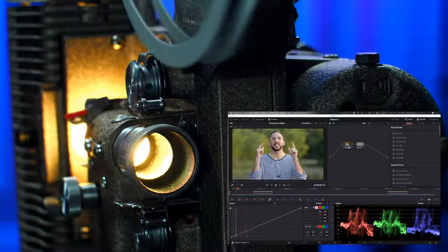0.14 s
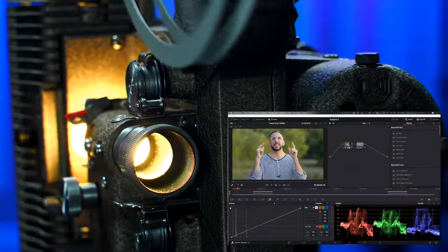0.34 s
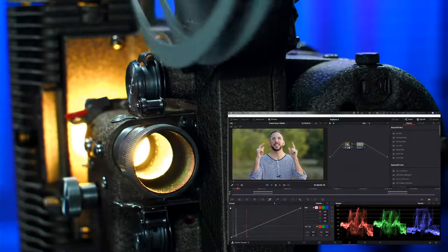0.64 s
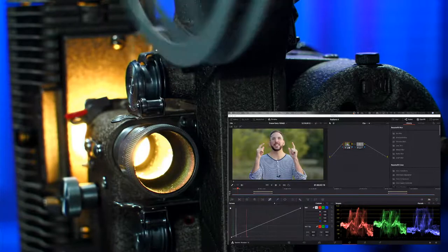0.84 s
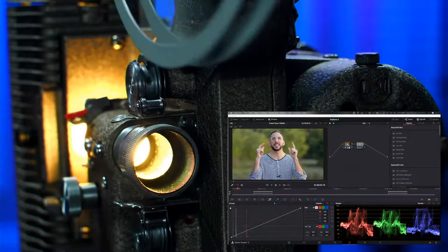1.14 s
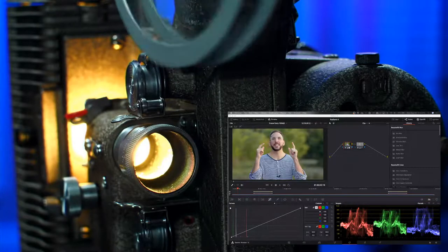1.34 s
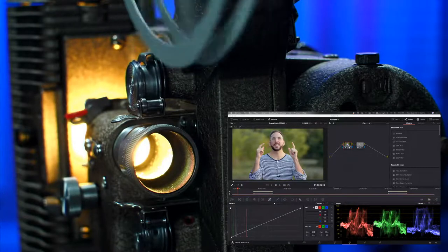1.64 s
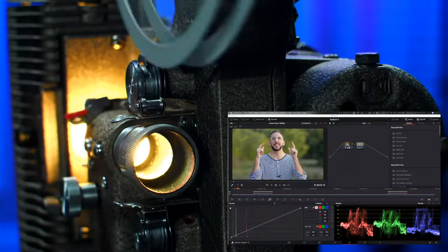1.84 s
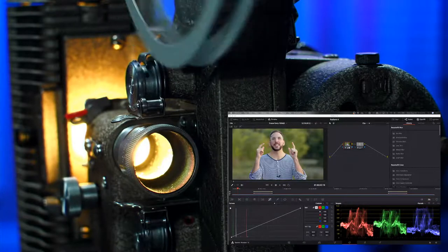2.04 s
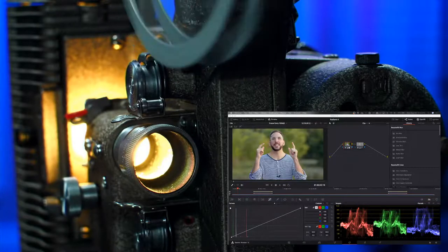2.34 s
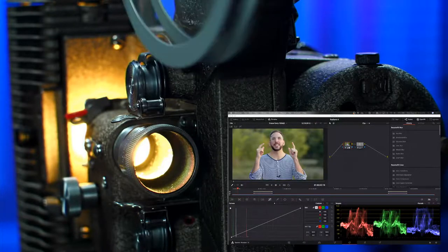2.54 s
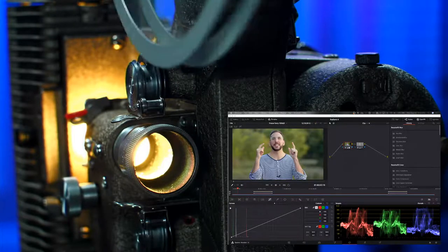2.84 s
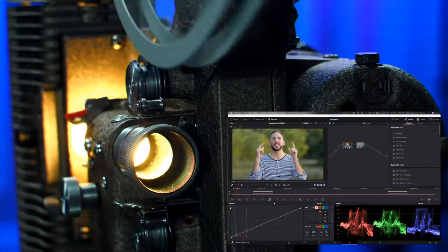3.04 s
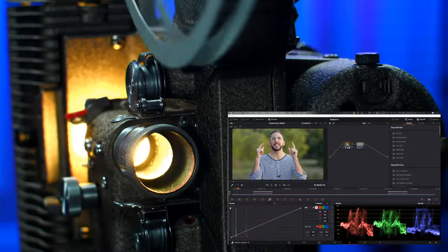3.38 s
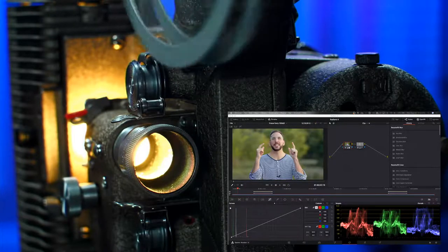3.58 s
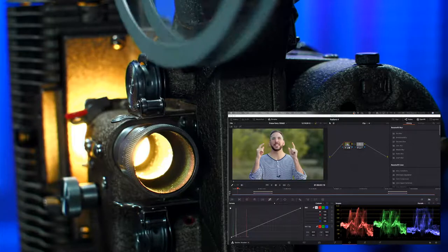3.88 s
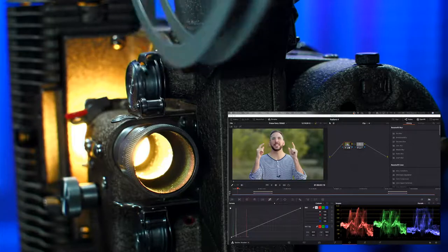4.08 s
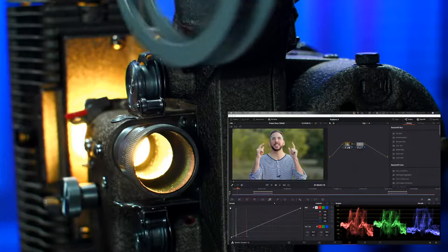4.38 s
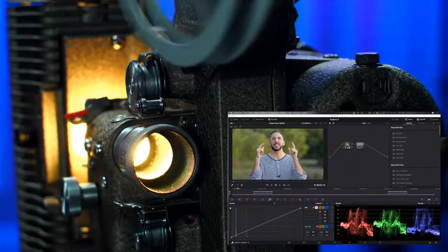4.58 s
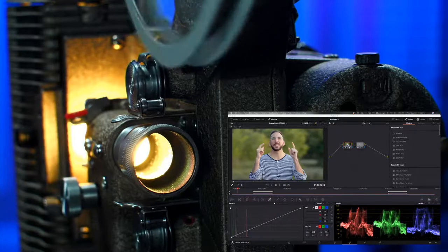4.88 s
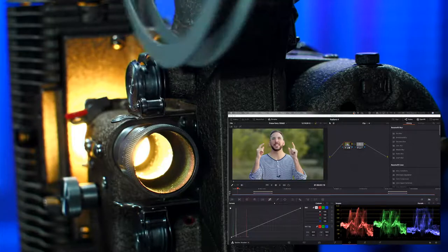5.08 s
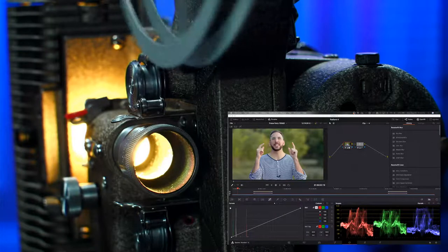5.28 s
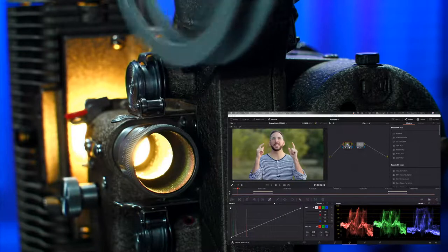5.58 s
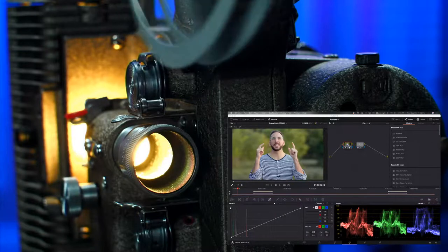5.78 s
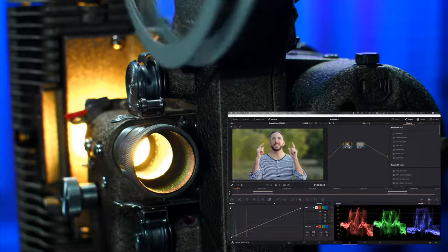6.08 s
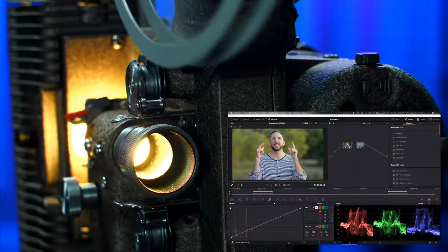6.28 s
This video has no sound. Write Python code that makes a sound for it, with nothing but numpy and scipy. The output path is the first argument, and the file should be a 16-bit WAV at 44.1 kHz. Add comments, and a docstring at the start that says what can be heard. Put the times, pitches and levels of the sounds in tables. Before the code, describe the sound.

An old film projector runs steadily close by, with a fast, bright clatter over a whirring motor.

```python
"""An old film projector running steadily in a room, close to the microphone.
Its steel claw snaps into the film 16 times a second, and the film rattles in the gate.
The motor turns about 76 times a second: the casing sings at the shaft's orders, the gears whine,
and in every turn the brushes hiss and the bearing knocks and ticks.
Cooling air rushes behind it all; the table and nearby walls send back weak early echoes."""
import sys
import numpy as np
from scipy import signal
from scipy.fft import rfft, irfft, next_fast_len
from scipy.io import wavfile
from scipy.ndimage import map_coordinates

SR = 44100
rng = np.random.default_rng(int(sys.argv[2]) if len(sys.argv) > 2 else 0)


def put_to_file(sound):
    """Save the sound as 16-bit audio at rate SR, in the file named by the first command-line argument."""
    columns = np.atleast_2d(sound).T  # one column per channel
    safe = np.clip(columns, -1, 1)
    whole_steps = np.round(safe * 32767)
    wavfile.write(sys.argv[1], SR, whole_steps.astype(np.int16))


N = 283122
FRAMES_PER_TURN = .20942  # gearing from the motor down to the film
BEATS_PER_TURN = .346  # beat of the shaft against the gear teeth

# contacts of claw and film in each frame: phase_frames, level_db, chatter_t60_s
CLAW_CONTACTS = [(0.176, -36, 0.0063), (0.303, -34, 0.0048), (.334, -26.5, 0.009), (0.689, -41, 0.013)]
# resonances of the claw's tip and the gate: pitch_hz, width_hz, level_db
TIP_MODES = [(7370, 130, -9.5), (8310, 200, 3), (8950, 510, 7.5), (10800, 1100, -7)]
# resonances of the claw's arm: pitch_hz, width_hz, level_db
ARM_MODES = [(2750, 700, -4), (4780, 340, 4.5)]
# frames struck harder or softer than usual: time_s, force_db
ODD_STROKES = [(.15, -3), (.34, 2), (.65, -2.5), (.97, 2.5), (1.03, -4), (1.16, 3.5), (1.22, 2.5),
               (1.29, 4), (1.35, -3.5), (2.04, -8), (2.1, 3), (2.6, -11), (2.67, 3), (2.73, -5.5),
               (2.98, -3), (3.3, 3), (3.48, 2), (3.74, 1.5), (3.99, -6), (4.05, -3), (4.3, -4), (4.37, 2),
               (4.56, -1), (4.74, -2), (4.81, 2), (5.19, -3.5), (5.31, 2), (5.56, -3.5), (5.69, 5),
               (5.75, 2), (6.13, -4.5), (6.32, 3)]
def claw(frames):
    """Each contact is a clean blow and a short chatter that ping the claw; hard strokes are brighter."""
    accent_frames, accent_db, scatter_db, chatter_db = 4.73, 1.2, .8, -4
    t = np.arange(SR // 40) / SR
    cushion = signal.butter(4, 11300, fs=SR, output="sos")  # the film softens the top of the ping
    frame = np.arange(int(frames[-1]) + 1)
    force_db = accent_db * np.cos(2 * np.pi * (frame / accent_frames - .01))
    force_db += scatter_db * rng.standard_normal(len(frame))
    for time_s, db in ODD_STROKES:
        force_db[int(frames[int(time_s * SR)])] = db
    out = np.zeros(N + len(t))
    for modes, levels_db in ((TIP_MODES, force_db - 1.7), (ARM_MODES, .5 * force_db - 5)):
        ping = signal.sosfilt(cushion, resonate(np.arange(N) == 0, modes)[:len(t)])
        for phase, db, t60_s in CLAW_CONTACTS:
            decay = amp(-60 * t / t60_s) * (1 - np.exp(-t / .0003))
            decay_norm = np.linalg.norm(decay)
            for start, frame_db in zip(np.searchsorted(frames, frame + phase), levels_db):
                blow = t == 0
                chatter = amp(chatter_db) * decay / decay_norm * rng.standard_normal(len(t))
                ring = signal.fftconvolve(blow + chatter, ping)[:len(t)]
                ring *= decay_norm / np.linalg.norm(ring)  # the cam gives strokes nearly equal energy
                out[start:start + len(t)] += amp(db + frame_db) * ring
    return out[:N]


# motor tones and their beat sidebands: shaft_order, level_db, lower_db, upper_db
MOTOR_TONES = [(3, -69.5, -80, -78), (4, -67, -73, -92), (5, -60.5, -72, -69), (6, -56, -65, -57),
               (7, -43.5, -63, -66), (8, -47, -63, -58.5), (9, -58, -73, -67), (11, -44.0, -45.5, -59.5),
               (12, -60.0, -63.5, -68), (14, -59, -70, -50.5), (15, -49, -56, -59.5),
               (16, -52, -53.0, -63.5), (17, -62.5, -57.5, -57), (18, -53.5, -53.5, -58),
               (19, -70, -74, -52), (20, -58, -55, -52), (21, -52, -60, -54), (22, -56.5, -51, -57),
               (23, -47, -46.5, -55.0), (24, -74, -61.0, -61), (26, -60, -66, -68)]
# low hum of the shaft's unbalance: shaft_order, level_db
UNBALANCE_HUM = [(1, -94), (2, -84)]
def motor(turns):
    """The whir: shaft orders and their sidebands, wavering a little as the load shifts."""
    out = sum(amp(db) * tone(order * turns) for order, db in UNBALANCE_HUM)
    for order, db, lower_db, upper_db in MOTOR_TONES:
        out += amp(db) * casing_tone(turns, order) * waver(depth_db=.9, rate_hz=7)
        lower = amp(lower_db) * casing_tone(turns, order, side=-1)
        upper = amp(upper_db) * casing_tone(turns, order, side=1)
        out += (lower + upper) * waver(depth_db=1.2, rate_hz=10)
    return out


# jolts of the shaft on the casing in each turn: phase_turns, hardest_at_beats
SHAFT_JOLTS = [(0.0, .51), (.11, .09)]
# resonances of the casing: pitch_hz, width_hz, level_db
CASING_MODES = [(487, 59, -6.5), (610, 93, -4.5), (712, 32, -2.5), (792.4, 24.6, 6.5), (1180, 150, -1),
                (1580, 160, -2.5), (1732, 54, 3)]
def casing_tone(turns, order, side=0):
    """A shaft order or its sideband, rms 1; the same jolts set every phase, so together they purr."""
    smear_s = .00008  # spread in travel time through the casing
    multiple = order + side * BEATS_PER_TURN
    push = sum(np.exp(-2j * np.pi * (order * at + side * beat_at)) for at, beat_at in SHAFT_JOLTS)
    pitch_hz = multiple * turns[-1] * SR / N
    phase = np.angle(push * response(pitch_hz, CASING_MODES))
    phase += 2 * np.pi * pitch_hz * smear_s * rng.standard_normal()
    return np.sqrt(2) * np.cos(2 * np.pi * multiple * turns + phase)


# gear and shutter tones: cycles_per_frame, level_db
GEAR_TONES = [(6, -79.5), (9, -74.5), (12, -84), (15, -64.5), (18, -76), (21, -58.5), (30, -61), (36, -53),
              (42, -59), (46, -69), (60, -50)]
def gears(frames):
    """Teeth and shutter blades sing at whole multiples of the frame rate."""
    return sum(amp(db) * tone(order * frames) * waver(depth_db=2.5, rate_hz=8)
               for order, db in GEAR_TONES)


# rise and fall of the shaft's tenth order: time_s, lead_db
SHAFT_LEAD = [(0.0, 8), (0.7, 6.5), (1.35, 4.5), (1.85, -12), (2.4, -5.5), (2.8, -4), (3.1, -3), (4.3, 0),
              (5.55, -4), (6.1, -3)]
def trading_tones(turns):
    """A shaft tone and a gear tone near 750 Hz take turns in the lead: as one swells, the other fades."""
    lead_db = curve(SHAFT_LEAD)
    shaft = amp(-49 + lead_db) * casing_tone(turns, order=10)
    gear = amp(-51 - .49 * lead_db) * tone(45 * FRAMES_PER_TURN * turns)
    return shaft * waver(depth_db=-1.5, rate_hz=4.8) + gear * waver(depth_db=3, rate_hz=4.6)


# resonances of the bearing plate: pitch_hz, width_hz, level_db
BEARING_MODES = [(1977, 66, 0.5), (2133, 74, 4.5), (2310, 107, 1), (2574, 49, 5.5), (2920, 220, 1.5),
                 (3226, 140, 0.5), (3500, 184, 0.5), (4370, 180, -2), (4700, 170, -8), (5094, 80, 1)]
def bearing_rattle(turns):
    """Play in the bearings shakes the casing with a rub and a slower chug; the plate rings steadily."""
    rub = swell(turns, peak_at=.13, depth_db=2.5)
    chug = swell((1 - BEATS_PER_TURN) * turns, peak_at=.32, depth_db=2)
    casing = unit(resonate(rng.standard_normal(N) * rub * chug, CASING_MODES))
    plate = unit(resonate(rng.standard_normal(N), BEARING_MODES))
    return amp(-41.5) * casing + amp(-47.5) * plate


# spots where the brushes catch on the commutator: phase_turns, level_db, pressure_swing_db
BRUSH_CATCHES = [(.2, -19, 8), (.29, -16, 8), (.38, -13, 7), (.47, -4, 4.5), (.55, -2.5, 3.8),
                 (.62, -1, 2.2), (.68, -2, 3.4), (.74, -6, 3.6), (.81, -14, 6), (.9, -16, 8)]
# colour of the brush hiss: frequency_hz, density_db
BRUSH_COLOUR = [(3000, -17.5), (7600, -23.5), (8400, -1), (9200, -8), (10000, -10), (11300, -7), (12100, 1),
                (12750, -2), (13000, -7), (13650, 0), (14200, -13), (15050, -13), (15800, -28)]
# loudness of the brush hiss: time_s, level_db
BRUSH_LEVEL = [(0.0, -46.5), (0.9, -46), (1.4, -48), (1.7, -47.2), (1.95, -52), (2.2, -46.5), (2.45, -47),
               (2.7, -44.5), (3.3, -47), (4.0, -46), (4.8, -45.6), (5.3, -48), (5.8, -46.9), (6.42, -46)]
def brushes(turns):
    """The brushes catch at the same spots each turn: a few always rasp, others only when pressed hard."""
    catch_width_turns = .036
    count = int(turns[-1]) + 3
    claw_load = .85 * np.cos(2 * np.pi * (2 * FRAMES_PER_TURN * turns - .44))  # peaks twice a frame
    hop = rng.standard_normal(count)  # shared by all catches of a turn
    power = amp(-26) ** 2  # smooth sliding between the catches
    for phase, db, swing_db in BRUSH_CATCHES:
        turn = np.round(turns - phase).astype(int)
        bounce = .65 * (hop + rng.standard_normal(count))
        pressure = np.minimum(claw_load + bounce[turn], 1.15)
        catch = np.exp(-((turns - phase - turn) / catch_width_turns) ** 2)
        power += amp(db + swing_db * pressure) ** 2 * catch
    hiss = unit(noise(BRUSH_COLOUR) * np.sqrt(power))
    return amp(curve(BRUSH_LEVEL)) * hiss * waver(depth_db=.4, rate_hz=12)


# colour of the metal body's dense ring: frequency_hz, density_db
METAL_COLOUR = [(1800, -36), (2000, -1.5), (2300, 2), (2450, 2), (2600, 1), (3100, -5.5), (3500, -4.5),
                (4000, -6), (4400, -2.5), (5150, -9), (5700, -10), (7000, -8.5), (9000, -14)]
def bearing_knock(turns):
    """The shaft taps its bearing once a turn, at one of two points, and sets the metal body ringing."""
    turn = np.arange(int(turns[-1]) - 1)
    starts = np.interp(turn + .01, turns, np.arange(N)).astype(int)
    beat_db = 3 * np.cos(2 * np.pi * BEATS_PER_TURN * turn)  # about every third tap is stronger
    force = amp(beat_db + rng.uniform(-3.5, 3.5, len(turn)))
    first_point = rng.random(len(turn)) < .5
    t = np.arange(SR // 12) / SR
    decay = (amp(-60 * t / .044) + amp(-4 - 60 * t / .12)) * (1 - np.exp(-t / .0013))
    out = np.zeros(N)
    for struck in (first_point, ~first_point):
        taps = np.bincount(starts, force * struck, N)
        ring = noise(METAL_COLOUR)[:len(t)] * decay
        out += signal.fftconvolve(taps, ring)[:N]
    return amp(-49.5) * unit(out)


# rattles in each frame, after the claw pulls and as it lets go: phase_frames, level_db, width_frames
FILM_FLAPS = [(.36, 1, 0.023), (.405, -5.5, 0.023), (.535, -1.5, .02), (.6, -6.5, 0.033),
              (.73, -10.5, 0.067)]
# resonances of the gate's sprung pressure plate: pitch_hz, width_hz, level_db
GATE_MODES = [(3474, 140, 5.5), (5720, 170, 0), (6220, 100, 1), (6600, 240, -2), (7290, 170, 1.5),
              (8100, 300, -2.5), (9450, 360, -1.5)]
def film_rattle(frames):
    """The film rattles against the pressure plate in two bursts a frame, then settles."""
    scatter_db = 2.2
    count = int(frames[-1]) + 3
    push = np.zeros(N)
    for phase, db, width in FILM_FLAPS:
        frame = np.round(frames - phase).astype(int)
        force = amp(db + scatter_db * rng.standard_normal(count))
        push += force[frame] * np.exp(-((frames - phase - frame) / width) ** 2)
    return amp(-54) * unit(resonate(push * rng.standard_normal(N), GATE_MODES))


# colour of the bearing's tick: frequency_hz, density_db
TICK_COLOUR = [(1500, -29), (2100, 0.5), (3600, -3), (4500, -9), (6000, -15)]
def bearing_tick(turns):
    """The shaft crosses the play in its bearing with a short dry tick in every turn."""
    phase_turns, width_turns = .99, .048
    offset = (turns - phase_turns + .5) % 1 - .5
    burst = np.exp(-.5 * (offset / width_turns) ** 2)
    return amp(-54.5) * unit(noise(TICK_COLOUR) * burst)


# colour of the air behind the clatter: frequency_hz, density_db
FAN_COLOUR = [(25, -37), (70, -25), (140, -9.5), (200, -11), (270, -0.5), (400, 1.5), (900, -3.5),
              (1350, 1.5), (1900, 2.5), (2450, -4), (3000, -5.5), (3900, -7.5), (5000, -8.5), (5900, -11.5),
              (7500, -17.5), (9000, -12), (15500, -24)]
def fan():
    """Cooling air rushes through the lamp house."""
    return amp(-44) * noise(FAN_COLOUR) * waver(depth_db=1.5, rate_hz=9)


def room(direct):
    """Weak early echoes off the table and nearby walls ripple the treble at the close microphone."""
    echo_db, t60_s = -17.5, .084
    t = np.arange(SR // 25) / SR
    treble = noise([(1200, -29), (2500, 1.5), (8000, 2), (13000, -3)])
    echoes = treble[:len(t)] * amp(-60 * t / t60_s)
    return direct + amp(echo_db) * signal.fftconvolve(direct, echoes / np.linalg.norm(echoes))[:N]


def amp(db):
    """Decibels to gain."""
    return 10 ** (np.asarray(db) / 20)


def unit(x):
    """Scale to rms 1."""
    return x / np.sqrt(np.mean(x ** 2) + 1e-20)


def curve(rows):
    """One value per sample from rows of time_s, value."""
    return np.interp(np.arange(N) / SR, *np.transpose(rows))


def tone(cycles):
    """A sine of rms 1 that follows a running count of cycles."""
    return np.sqrt(2) * np.sin(2 * np.pi * (cycles + rng.random()))


def swell(cycles, peak_at, depth_db):
    """A gain of rms 1 that peaks at the given share of each cycle."""
    return unit(amp(depth_db * np.cos(2 * np.pi * (cycles - peak_at))))


def wobble(rate_hz):
    """A smooth random curve around zero."""
    knots = rng.standard_normal(int(N * rate_hz / SR) + 4)
    return map_coordinates(knots, [np.arange(N) * rate_hz / SR], mode="nearest")


def waver(depth_db, rate_hz):
    """A slowly wandering gain of rms 1."""
    knots = rng.standard_normal(int(N * rate_hz / SR) + 2)
    return unit(amp(depth_db * np.interp(np.arange(N) * rate_hz / SR, np.arange(len(knots)), knots)))


def filtered(x, gain):
    """Filter x by a complex gain that is a function of frequency."""
    size = next_fast_len(N + 8192)
    return irfft(rfft(x, size) * gain(np.fft.rfftfreq(size, 1 / SR)), size)[:N]


def noise(colour):
    """Noise of rms 1, coloured by rows of frequency_hz, density_db."""
    hz, db = np.transpose(colour)
    white = rng.standard_normal(N)
    return unit(filtered(white, lambda f: amp(np.interp(np.log(f + 1), np.log(hz), db))))


def response(f, modes):
    """Complex gain of resonances that alternate in sign."""
    return sum((-1) ** k * amp(db) * 1j * f * width / (hz * hz - f * f + 1j * f * width)
               for k, (hz, width, db) in enumerate(modes))


def resonate(x, modes):
    """Ring x through rows of pitch_hz, width_hz, level_db."""
    return filtered(x, lambda f: response(f, modes))


# slight drift of the motor's speed: time_s, turns_per_s
MOTOR_SPEED = [(0.0, 75.39), (0.47, 75.25), (0.8, 75.75), (1.29, 75.54), (1.73, 76.14), (2.73, 76.11),
               (3.1, 75.64), (3.34, 76.0), (4.06, 75.65), (4.19, 75.95), (4.8, 75.62), (5.28, 75.95),
               (5.72, 75.67), (5.92, 76.11), (6.42, 76.07)]
def scene():
    """The projector from close by: one shaft drives the whir, the clatter and the brushes."""
    turns = np.cumsum(curve(MOTOR_SPEED)) / SR
    frames = FRAMES_PER_TURN * turns
    loose_turns = turns + .0008 * wobble(rate_hz=30)  # backlash makes the tones flutter
    whir = motor(loose_turns) + gears(FRAMES_PER_TURN * loose_turns) + trading_tones(loose_turns)
    bearings = bearing_rattle(turns) + bearing_tick(turns) + bearing_knock(turns)
    clatter = claw(frames) + film_rattle(frames)
    return room(clatter + whir + bearings + brushes(turns) + fan())[None]


def record(dry):
    """One microphone close to the projector; it thins the deep bass and passes nothing above top_hz."""
    low_cut_hz, top_hz = 85, 15850
    return filtered(dry[0], lambda f: (f < top_hz) * f ** 2 / np.hypot(f ** 2, low_cut_hz ** 2))[None]


dry = scene()
out = record(dry)
put_to_file(out)
```